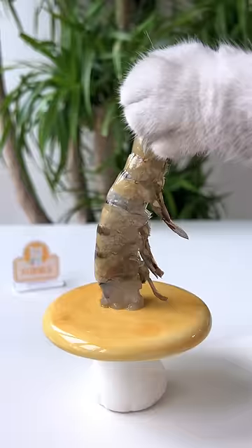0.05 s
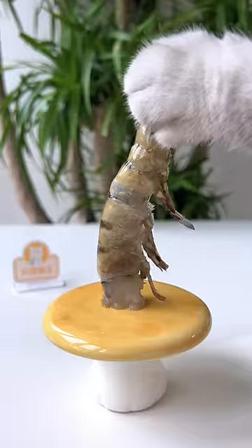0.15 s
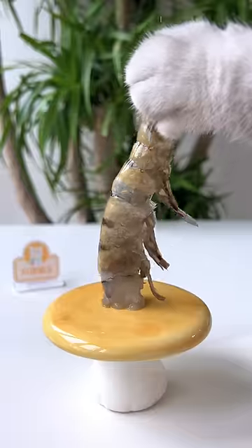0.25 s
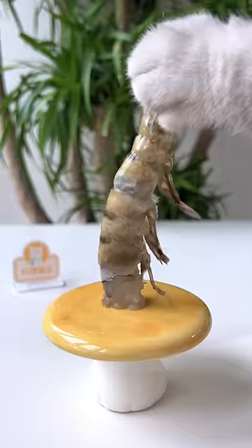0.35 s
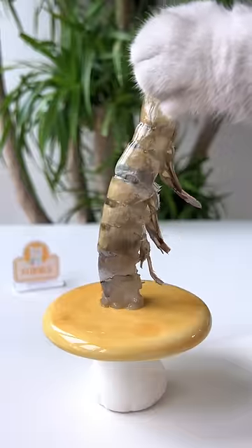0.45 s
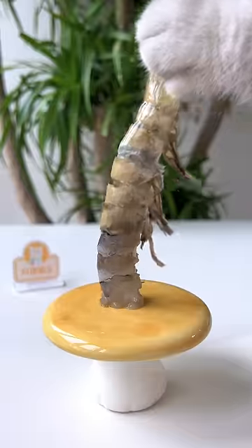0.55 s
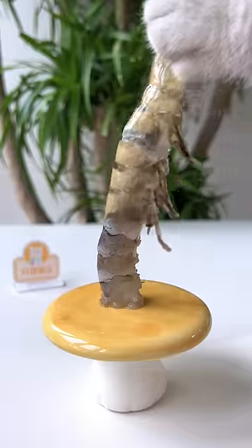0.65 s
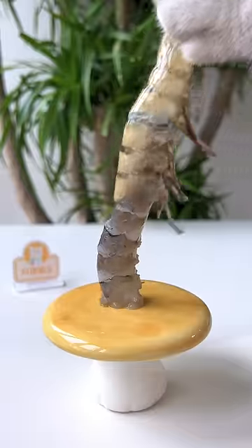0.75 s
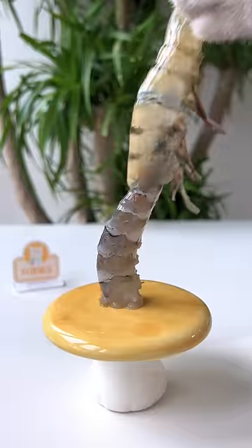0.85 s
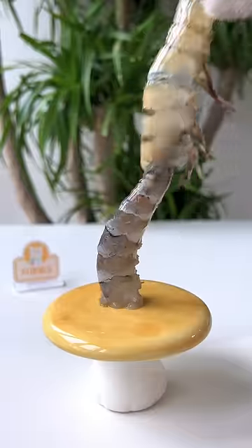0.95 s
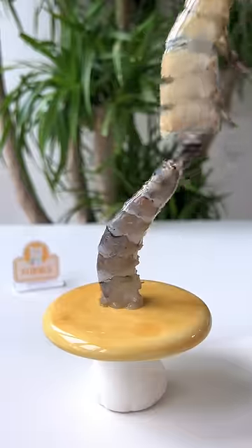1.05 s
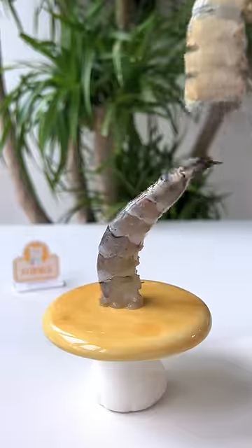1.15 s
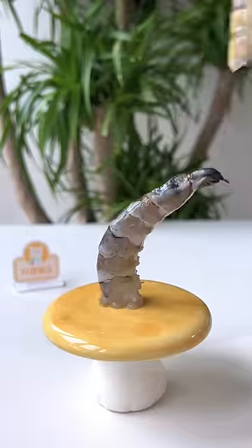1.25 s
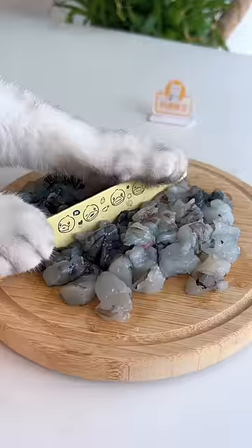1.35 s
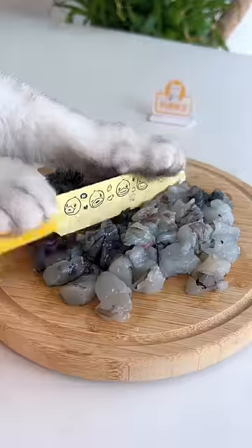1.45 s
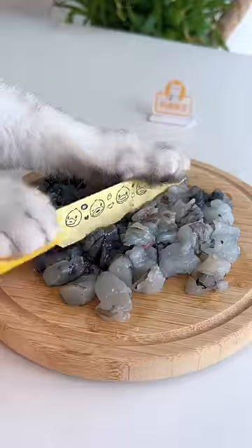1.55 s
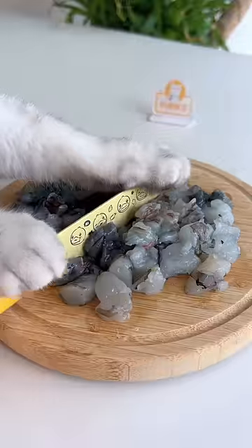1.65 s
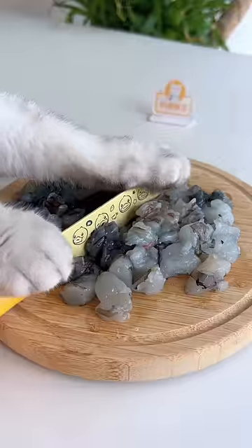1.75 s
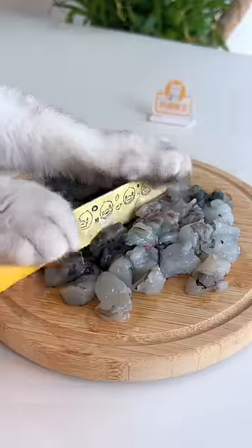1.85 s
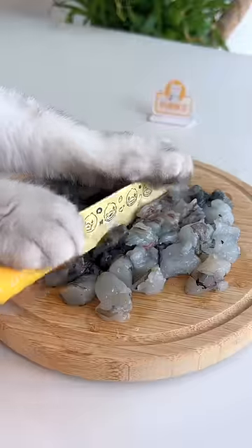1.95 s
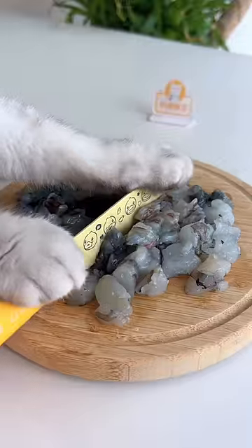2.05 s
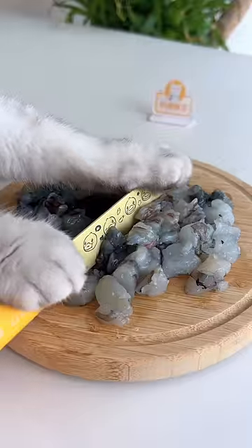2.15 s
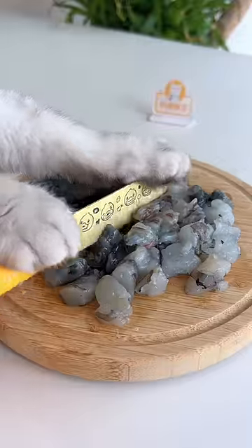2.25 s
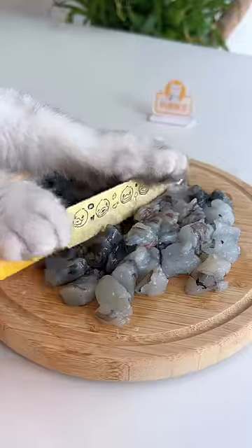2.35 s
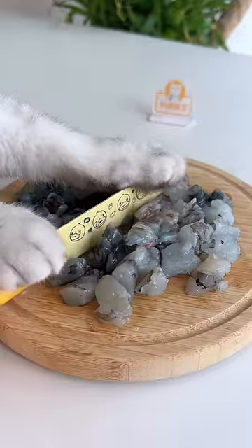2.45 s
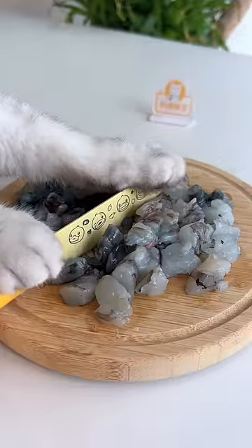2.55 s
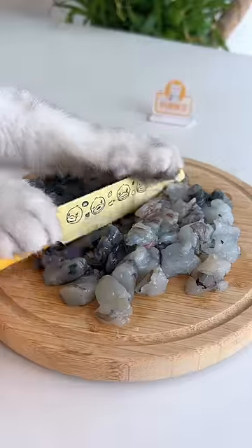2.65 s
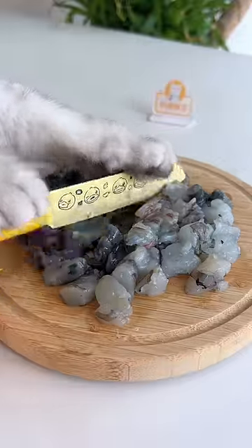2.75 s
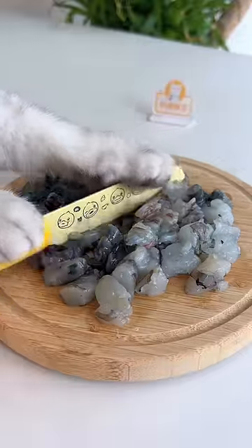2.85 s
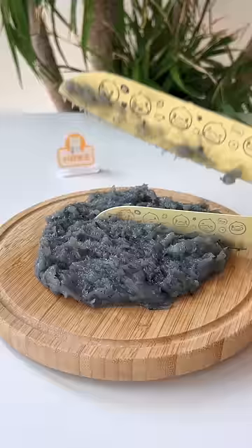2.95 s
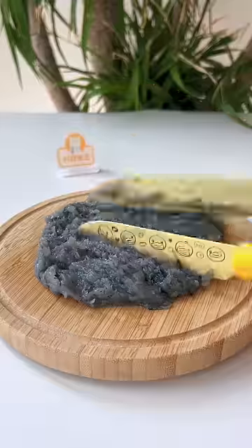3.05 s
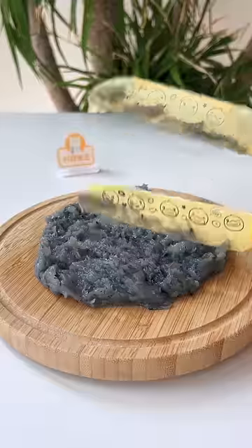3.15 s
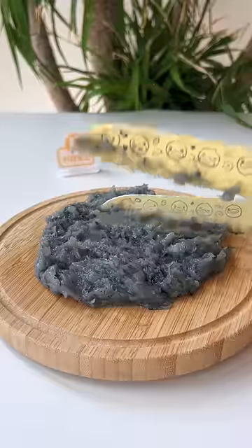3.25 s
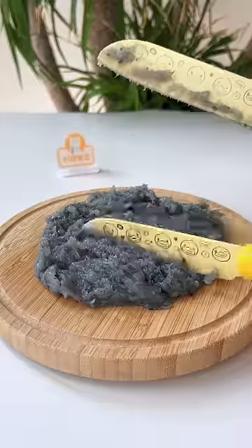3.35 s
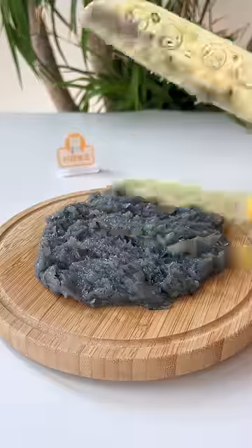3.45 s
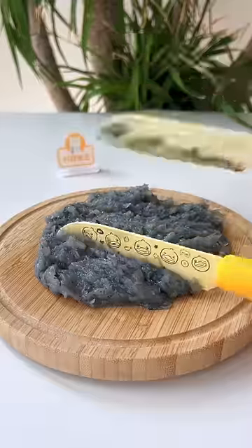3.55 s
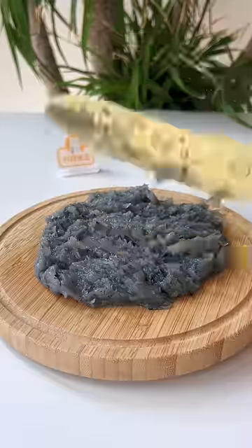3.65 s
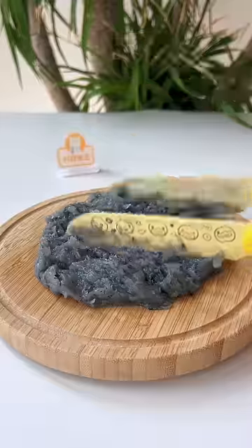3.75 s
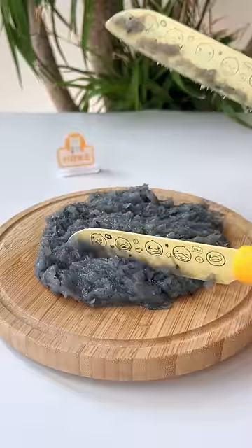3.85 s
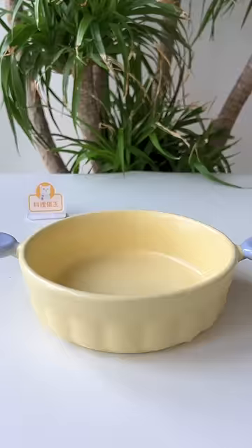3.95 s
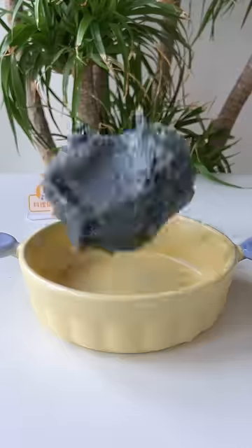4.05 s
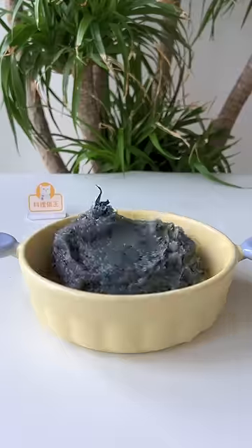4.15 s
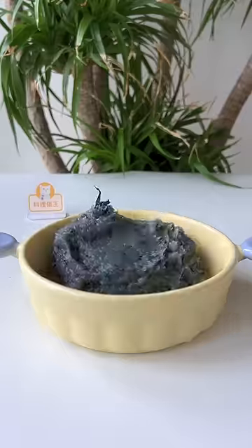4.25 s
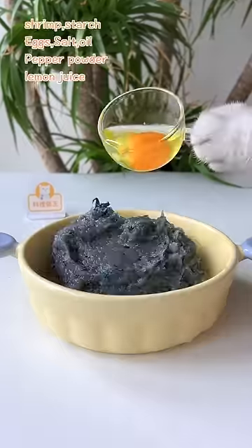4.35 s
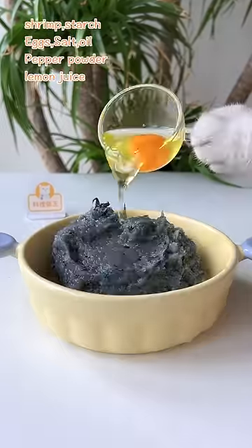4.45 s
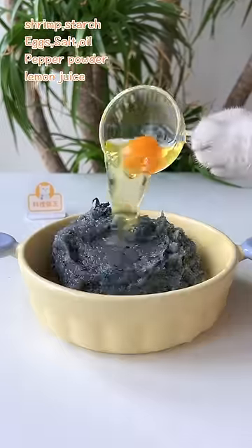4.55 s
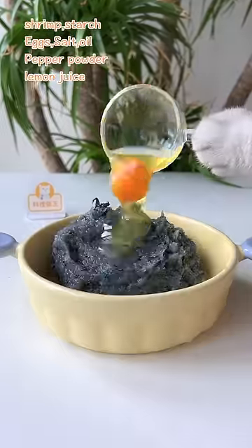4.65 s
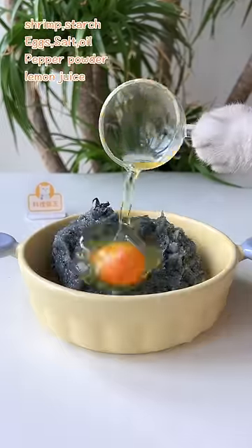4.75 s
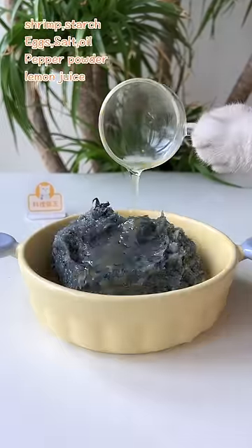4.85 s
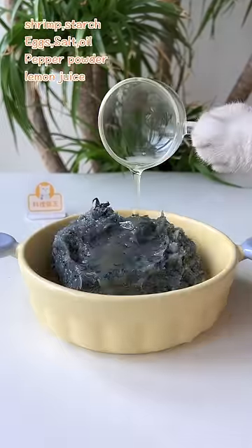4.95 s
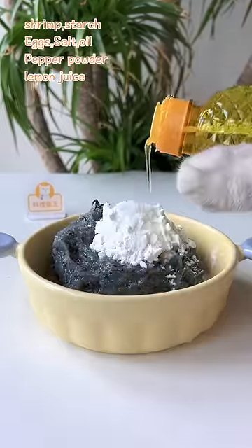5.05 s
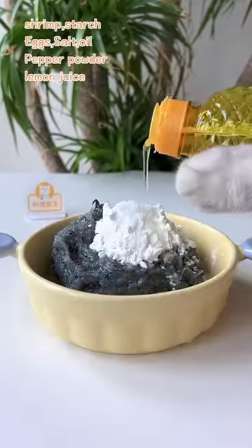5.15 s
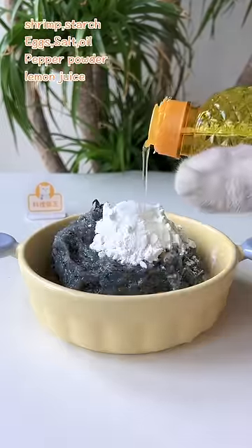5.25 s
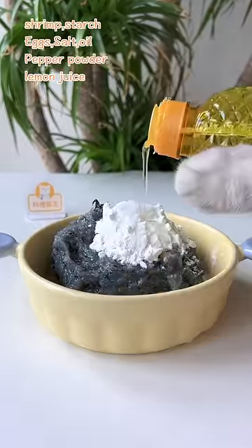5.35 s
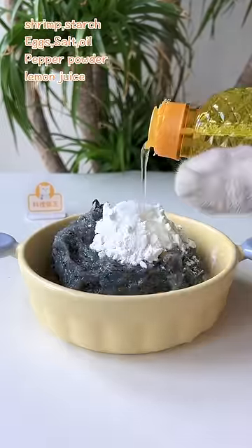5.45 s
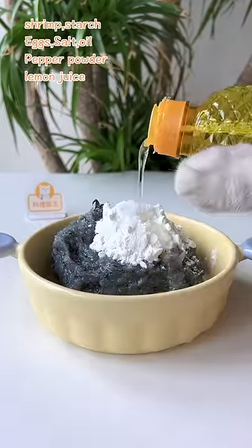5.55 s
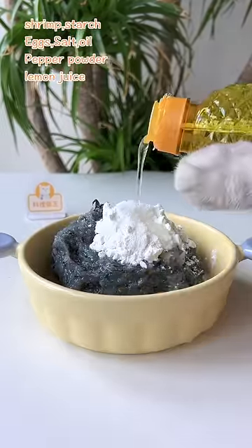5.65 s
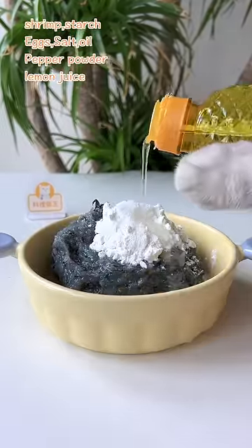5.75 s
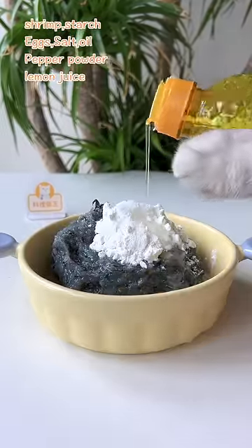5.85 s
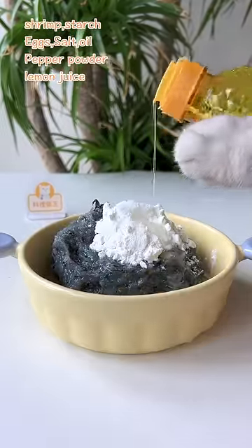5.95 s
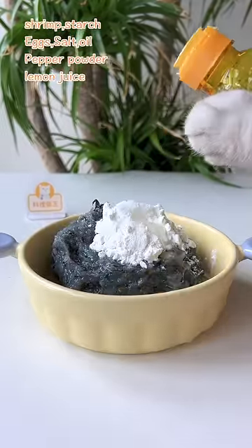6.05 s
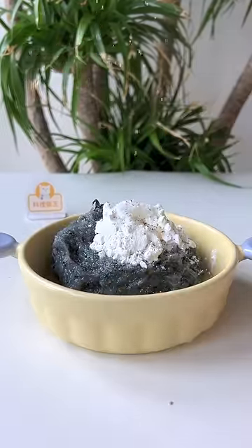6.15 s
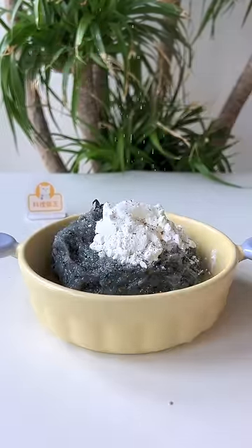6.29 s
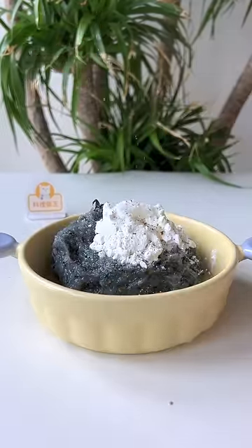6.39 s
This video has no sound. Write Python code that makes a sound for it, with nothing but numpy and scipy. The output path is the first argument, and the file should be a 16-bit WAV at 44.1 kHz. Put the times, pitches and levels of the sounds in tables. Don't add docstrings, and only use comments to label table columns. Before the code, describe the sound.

Close-up kitchen prep: brittle shell snaps, wet squashing, seven steady board chops, a sticky plop, faint egg and oil dribbles, then pattering seasoning.

```python
import sys
import numpy as np
from scipy import signal
from scipy.fft import rfft, irfft, next_fast_len
from scipy.io import wavfile
from scipy.ndimage import uniform_filter1d

SR = 44100
rng = np.random.default_rng(int(sys.argv[2]) if len(sys.argv) > 2 else 0)


def pcm_store(signal):
    levels = np.round(np.clip(np.atleast_2d(signal), -1, 1) * 32767)
    wavfile.write(sys.argv[1], SR, levels.astype(np.int16).T)


def ratio_of_db(decibels):
    return 10 ** (np.asarray(decibels, float) / 20)


N = 283122

# start t/s, end t/s, fade t/s
SHOTS = [
    (0.079, 1.137, 0.041),
    (1.563, 2.303, 0.023),
    (2.333, 3.068, 0.045),
    (3.057, 3.997, 0.049),
    (4.045, 4.239, 0.032),
    (4.433, 6.138, 0.041),
    (6.129, 6.6, 0.02),
]
# rumble level/dB, hiss over murmur level/dB, share of the stir from hands (0-1)
BEDS = [(-48, -11.5, 1), (-53.5, -10.5, 0.2), (-54, -12, 0), (-59.5, 3.5, 1), (-51.5, -4.5, .8),
        (-75.5, -1, 0), (-48, -36, .3)]
# t/s, level/dB
STIR = [(.12, -53.5), (.58, -62.5), (.7, -52.5), (1.1, -55), (1.62, -64), (2.2, -60.5), (2.69, -61),
        (2.83, -68.5), (3.09, -76), (3.2, -93), (3.88, -80.5), (3.96, -72), (4.1, -71.5), (4.76, -70),
        (4.93, -65.5), (5.65, -62.5), (6.1, -66.5), (6.2, -61.5)]

# t/s, body peak level/dB, f/Hz, bright edge peak level/dB
SHELL_SNAPS = [(.1263, -33, 3160, -38), (.2096, -18, 3850, -16), (.2143, -20.5, 3300, -47.5),
               (.2744, -14, 5000, -9), (.3158, -9, 4700, -11), (.332, -17.5, 4500, -33),
               (.4261, -38, 4270, -41.5), (.4871, -10, 2800, -6.5), (.5232, -18.5, 2200, -26.5),
               (.5513, -20.5, 3600, -32.5), (.591, -26.5, 3650, -29), (.683, -21.5, 5600, -28),
               (.735, -22, 4780, -17), (.739, -9.5, 3900, -8), (.7631, -24, 4200, -27),
               (.8515, -38.5, 1470, -23), (.922, -37.5, 3340, -23.5), (.988, -25.5, 2440, -47)]
# t/s, body peak level/dB, f/Hz, bright edge peak level/dB
KNIFE_SNAPS = [(1.6914, -24.5, 2720, -26), (1.7275, -23, 3870, -17), (1.8186, -28.5, 7600, -18.5),
               (2.0479, -33, 5600, -52), (2.1822, -27, 3660, -55), (2.4207, -65, 1790, -37),
               (2.7395, -33, 700, -19.5), (3.1082, -37, 1014, -38), (3.3819, -49, 2190, -26),
               (3.3871, -37.5, 7300, -22.5), (3.5159, -48, 1026, -28), (3.6547, -37.5, 6670, -23),
               (3.7164, -30, 7060, -15.5), (3.7801, -22, 7700, -8), (3.9248, -34, 1092, -21)]
# t/s, body peak level/dB, f/Hz, bright edge peak level/dB
GRAIN_SNAPS = [(6.2392, -26, 4780, -23), (6.2976, -19.5, 7800, -31), (6.303, -17.5, 3900, -35),
               (6.3358, -17, 6000, -10)]
# t/s, body peak level/dB, f/Hz, edge peak level/dB
SHELL_TICKS = [(0.1298, -46.0, 1120.0, -52.0), (0.1572, -44.0, 1250.0, -53.0),
               (0.168, -34.0, 2970.0, -56.0), (0.2575, -41.0, 4130.0, -52.0),
               (0.2778, -41.0, 4820.0, -47.0), (0.2988, -39.0, 5470.0, -41.0),
               (0.3066, -35.0, 4780.0, -36.0), (0.3195, -25.0, 4440.0, -16.0),
               (0.3269, -24.0, 4260.0, -29.0), (0.4904, -35.0, 3400.0, -40.0),
               (0.5405, -31.0, 3570.0, -50.0), (0.6754, -33.0, 3920.0, -48.0),
               (0.6858, -48.0, 2540.0, -45.0), (0.699, -47.0, 3270.0, -47.0),
               (0.8514, -42.0, 1590.0, -29.0), (0.9125, -41.0, 1210.0, -34.0),
               (0.9219, -43.0, 6200.0, -27.0), (1.0274, -50.0, 2450.0, -52.0),
               (1.0592, -48.0, 2200.0, -50.0), (1.0805, -53.0, 1850.0, -42.0)]
BOARD_TICKS = [(1.8747, -51, 4500, -49), (1.847, -52, 6800, -48), (2.0571, -48, 2070, -35),
               (2.2741, -51, 5500, -51), (2.6135, -41, 5000, -45), (2.9964, -50, 1890, -48),
               (3.2469, -44, 2020, -38), (3.2852, -66, 3230, -53), (3.3956, -51, 7110, -32),
               (3.5701, -65, 5040, -49), (4.1104, -40, 6000, -42), (4.1366, -36, 5000, -40),
               (4.1475, -14, 4600, -28), (4.1983, -34, 5400, -45), (6.2585, -36, 3500, -36)]
BOWL_TICKS = [(4.5018, -51.0, 2020.0, -73.0), (4.5105, -45.0, 3880.0, -51.0), (4.548, -46.0, 2200.0, -72.0),
              (4.5569, -50.0, 7320.0, -42.0), (4.6497, -57.0, 3490.0, -53.0),
              (4.6539, -47.0, 5680.0, -63.0), (4.6859, -39.0, 3190.0, -60.0), (4.698, -37.0, 4090.0, -58.0),
              (4.7518, -44.0, 2930.0, -61.0), (4.7653, -58.0, 3880.0, -50.0),
              (4.7797, -52.0, 2800.0, -38.0), (4.7987, -56.0, 1720.0, -52.0),
              (4.9414, -47.0, 4260.0, -42.0), (4.9611, -50.0, 2970.0, -46.0),
              (5.0108, -48.0, 5430.0, -46.0), (5.0333, -41.0, 4870.0, -57.0),
              (5.1061, -46.0, 2150.0, -42.0), (5.1312, -45.0, 1120.0, -64.0),
              (5.2548, -40.0, 4310.0, -43.0), (5.3301, -43.0, 1160.0, -41.0), (5.339, -56.0, 7240.0, -42.0),
              (5.3734, -38.0, 2710.0, -51.0), (5.382, -47.0, 4870.0, -46.0), (5.461, -48.0, 2580.0, -50.0),
              (5.4644, -53.0, 7490.0, -45.0), (5.5846, -48.0, 6290.0, -46.0),
              (5.6195, -44.0, 1940.0, -38.0), (5.6561, -33.0, 5210.0, -57.0),
              (5.7048, -45.0, 3700.0, -52.0), (5.7218, -28.0, 3400.0, -49.0),
              (5.7261, -32.0, 4130.0, -40.0), (5.7468, -42.0, 2670.0, -46.0),
              (5.8562, -46.0, 4780.0, -47.0), (5.9209, -33.0, 5000.0, -53.0), (5.963, -54.0, 3400.0, -46.0),
              (6.0026, -36.0, 3010.0, -52.0), (6.0141, -27.0, 4440.0, -42.0),
              (6.0486, -42.0, 5470.0, -52.0)]
TICK_DB, TICK_EDGE_DB = 2.5, 4

# t/s, peak level/dB, f/Hz
LUMP_FILMS = [(4.1066, -28, 1200), (4.1289, -35, 1214), (4.1488, -14, 2300), (4.1533, -19.5, 3700),
              (4.191, -24, 2040), (4.198, -26, 1010), (4.2152, -32, 5150)]
EGG_FILMS = [(4.5176, -33.5, 1870), (4.6326, -31.5, 3280), (4.691, -34.5, 3120), (4.8294, -32, 2580),
             (4.8508, -27, 2090), (4.9187, -38, 2890), (4.9273, -35.5, 7550)]
OIL_FILMS = [(5.0577, -34, 2150), (5.1633, -28, 2460), (5.163, -33.5, 7550), (5.186, -27, 6800),
             (5.2198, -34, 7500), (5.2277, -29, 2600), (5.2853, -34, 4400), (5.331, -34.5, 900),
             (5.356, -39, 800), (5.3898, -29, 2040), (5.4708, -28, 3290), (5.5372, -31.5, 6970),
             (5.5666, -30, 6830), (5.614, -27, 4800), (5.6595, -24, 3720), (5.717, -16.5, 3880),
             (5.7543, -30, 3660), (5.8589, -33.5, 2640), (5.8656, -30, 3800), (5.9436, -32.5, 1970)]
THIN_HZ = 6200
THICK_EDGE_DB, THIN_EDGE_DB = -27.5, 7
GLUG_MS, GLUG_HZ, GLUG_DB = 11, 761, -30.5

# t/s, level/dB, contact t/ms
FLESH_CHOPS = [(1.714, -29, 3), (1.725, -27, 3.06), (1.737, -29, 3), (2.476, -42, 4), (2.913, -25, 5),
               (3.401, -30, 4.5), (2.742, -33.5, 1.72)]
# t/s, level/dB, contact t/ms, suck level/dB, brightness (0-1)
PASTE_CHOPS = [(3.1139, -19.5, 1.13, -53.5, 0.042), (3.256, -20, 1.94, -58, 0.54),
               (3.385, -20.5, 4, -65, 1), (3.52, -16.5, 1.76, -66, 0.73), (3.653, -23.5, 4.4, -64, 0.46),
               (3.7905, -19, 1.05, -59, 0.69), (3.932, -17.5, 2.66, -61, 0.67)]
# f/Hz, width f/Hz, level/dB
BOARD_MODES = [(80, 37, 0), (136.6, 45, 7.5), (180, 24, 5.5), (268, 57, 7.5), (474, 85, -2),
               (1080, 190, -7), (2000, 86, -4.5)]
# f/Hz, width f/Hz, level/dB
BLADE = (2040, 45, 13)
RING_DB, RING_T60_S = -39, .075
SUCK_MS, SUCK_LEAD_S = 29, 0.0037

# centre t/s, length t/ms, level/dB, brightness (0-1)
PEEL = [(.158, 40, -52, 0), (.3178, 6, -20.5, .72), (.675, 12, -48, 0), (.873, 14, -52, .5),
        (.208, 24, -48, .3), (.304, 39, -47.5, 0.6), (.323, 9.1, -32, 0.69), (.33, 20, -35.5, 0.24),
        (.502, 34, -42, 0.2), (.541, 31, -42.5, 0.2), (.636, 37, -45, 0), (.732, 20, -43, 0),
        (.776, 71, -41, 0.47), (.85, 15, -50, 0.9), (.92, 34, -48, 0.86), (1.1, 51, -57, 1)]
SQUASH = [(1.598, 49, -61, 0), (1.705, 36, -39, 0.31), (1.731, 36.2, -34, 0.57), (1.768, 39.6, -37.5, 0.62),
          (1.943, 54.5, -49, 0.3), (2.082, 52.4, -41, 0.82), (2.118, 29.8, -34, 1), (2.184, 30, -55, 0.6),
          (2.518, 47.5, -42.5, 0.78), (2.556, 35, -33, 0.85), (2.637, 57, -51, 1), (2.743, 40.5, -49.5, .2),
          (2.917, 49.4, -37, 0.75), (2.943, 38.7, -37.5, 1), (3.014, 34.5, -52.5, 1), (3.68, 45, -57, .1)]
PLOP = [(4.114, 20, -47.5, 0.45), (4.136, 15.2, -41, 0.13), (4.153, 16.8, -31, 0.99), (4.17, 31, -49, 0.92),
        (4.201, 17.4, -37, 0)]
DRIBBLE = [(4.59, 48, -51, 0.49), (4.692, 25, -53, 0.55), (4.722, 22, -52.5, .3), (4.86, 39.2, -38, 0.3),
           (4.968, 70, -54, 0.52), (5.078, 57, -62, 0), (5.172, 31, -51, 0.4), (5.234, 54, -48, 0.66),
           (5.399, 35, -49.5, 0.47), (5.558, 39, -53, 0.8), (5.607, 31, -50, 0), (5.72, 30, -48, 0.8),
           (5.801, 30, -53.5, 1), (5.93, 41, -50, 0.059), (5.906, 14, -50, .8), (5.995, 40, -54, .6),
           (5.83, 30, -55, .4), (5.43, 30, -56, .6), (6.068, 58, -61.5, 0.17)]
SPRINKLE = [(6.251, 42, -49, 0.86), (6.306, 22, -41, 0.1), (6.35, 36.7, -45, .3), (6.39, 71.5, -50, 0.33),
            (6.285, 30, -52, .5), (6.325, 25, -48, .5), (6.2395, 5, -43, .8), (6.338, 6, -34, .8)]
# hollow, smack and fizz level/dB
SHELL_WET, FLESH_WET = [(-29.5, 1, -13), (-14.5, -12.5, 2)], [(0, -20.5, -5.5), (0, 0.5, -5)]
PASTE_WET, LUMP_WET = [(0, -36, -8.5), (0, 4, 17.5)], [(0, -22, -21), (0, 2.5, -17)]
DRIP_WET, GRAIN_WET = [(2, -13.5, -17.5), (-14, 0, -4.5)], [(-2.5, 0, -5.5), (-11, 0, 5.5)]
SEEP_S, SEEP_DB, SEEP_FIZZ_DB = 0.05, -26, -19

# centre t/s, length t/ms, f/Hz, level/dB
POCKETS = [(1.77, 37.5, 1895, -35.5), (1.768, 34, 3910, -38.5), (1.768, 24, 4590, -41),
           (1.947, 75, 2150, -51.5), (2.118, 24, 1700, -32), (3.675, 50, 2030, -64),
           (5.084, 35, 2300, -53.5), (5.171, 24, 1596, -56), (2.546, 9, 1000, -30), (2.557, 22, 1900, -31),
           (2.556, 18, 1100, -34), (2.558, 12, 3750, -35), (2.915, 14, 3400, -37), (2.944, 22, 3700, -36),
           (2.937, 20, 950, -38), (3.015, 25, 3800, -54), (2.075, 30, 950, -45), (2.082, 25, 2500, -43),
           (4.587, 22, 2900, -53), (4.857, 24, 2500, -41), (4.862, 20, 1800, -45), (5.276, 22, 2380, -54),
           (5.42, 30, 6800, -56), (5.595, 20, 1550, -52), (5.603, 14, 2030, -43), (5.41, 25, 2030, -56),
           (5.622, 14, 2020, -45), (5.838, 20, 2800, -54), (5.58, 20, 2030, -54), (6.07, 18, 1020, -57),
           (6.092, 40, 1306, -61.5), (0.64, 77, 1294, -55.5)]
# t/s, t60 t/ms, f/Hz, level/dB
BUBBLES = [(4.868, 160, 230, -50), (2.74, 30, 520, -36), (4.198, 45, 330, -33), (4.1288, 14, 1200, -30),
           (4.1525, 16, 1700, -22), (4.157, 16, 4000, -21), (5.058, 22, 2150, -38), (5.163, 25, 2500, -38),
           (5.214, 15, 4050, -36), (5.39, 34, 2040, -30), (5.538, 18, 2800, -43), (5.608, 14, 3000, -42),
           (5.858, 25, 1430, -41), (5.9035, 22, 3300, -38), (5.9697, 22, 3420, -29), (6.074, 12, 3480, -46),
           (6.3005, 20, 2900, -26)]
BUBBLE_RISE = 3

# f/Hz, density level/dB
FLESH = [(260, -34), (450, -9.5), (1000, -5.5), (1500, -10.5), (1940, -5), (2220, -8.5), (3770, -5.5),
         (5660, -9.5), (9590, -8), (11500, -14.5), (14000, -2), (15800, -11), (16500, -34.5)]
RUMBLE = [(15, -36), (25, -1.5), (70, 1.5), (162, -1), (313, -9.5), (470, -23), (680, -57), (1140, -120)]
AIR = [(320, -47), (550, -11), (742, -4.5), (1580, -1), (4780, -17.5), (8950, -23.5), (11700, -21),
       (14100, -19), (15800, -26.5), (16500, -47)]
TRICKLE = (4.45, 6.11)
# f/Hz, level/dB
BOWL_TONE = [(450, -11), (620, -7), (950, -3), (9000, 3.5), (15000, -9.5)]
WIDE_FROM = 6.14
# f/Hz, level/dB
WIDTH = [(40, -8), (300, -20), (650, 8.5), (2000, 0), (10000, 1), (15000, -5.5)]


def unit(x):
    return x / np.sqrt(np.mean(x ** 2) + 1e-20)


def along(points, hz):
    f, v = np.transpose(points)
    return np.interp(np.log(hz + 1), np.log(f + 1), v)


def filtered(x, response):
    m = next_fast_len(N + SR // 4, True)
    return irfft(rfft(x, m) * response(np.fft.rfftfreq(m, 1 / SR)), m)[..., :N]


def band(x, spectrum, lo_hz, hi_hz):
    def response(f):
        edges = 1 / np.sqrt((1 + (lo_hz / (f + 1)) ** 8) * (1 + (f / hi_hz) ** 8))
        return ratio_of_db(along(spectrum, f)) * edges
    return unit(filtered(x, response))


def resonance(f, hz, width, db):
    return ratio_of_db(db) * 1j * f * width / (hz * hz - f * f + 1j * f * width)


def wander(length):
    return unit(uniform_filter1d(rng.standard_normal(N), size=length))


def snaps(table):
    out, t = np.zeros((2, N + 900)), np.arange(800) / SR
    jf = 1j * np.fft.rfftfreq(2 * len(t), 1 / SR)
    burst = ratio_of_db(-60 * t / 0.002) + 0.048 * ratio_of_db(-60 * t / 0.025)
    flick = ratio_of_db(-60 * t / 0.003) + .06 * ratio_of_db(-60 * t / 0.032)
    steep = lambda x: 1 / ((1 + x) * (1 + x + x * x))
    for s, db, hz, edge_db in table:
        hiss = rng.standard_normal((2, len(t)))
        cycles = 10 * ratio_of_db(rng.normal(0, 2.5))
        pocket = np.sin(2 * np.pi * hz * t) * ratio_of_db(-60 * t * max(hz, 2900) / cycles)
        crack = 0.61 * max(3000 / hz, 1) * hiss[0] * burst
        size = steep(0.53 * hz / (jf + 1)) * steep(jf / np.clip(2.0 * hz, 6000, 9500))
        body = irfft(size * rfft(pocket + crack, 2 * len(t)))[:len(t)]
        edge = np.diff(hiss[1], prepend=0) * flick
        first = round(s * SR)
        out[0, first:][:len(t)] += ratio_of_db(db) * body / abs(body).max()
        out[1, first:][:len(t)] += ratio_of_db(edge_db) * edge / abs(edge).max()
    return out[0, :N] + filtered(out[1, :N], lambda f: f ** 4 / (f ** 4 + 8000 ** 4))


def faint_ticks(start, end, top_db, low_hz, count):
    u = rng.random((count, 4))
    when = start + (end - start) * u[:, 0]
    edge_db = top_db - 4 - 22 * u[:, 3]
    return np.c_[when, top_db - 16 * u[:, 1], low_hz * 5 ** u[:, 2], edge_db]


def films():
    return [(s, db, hz, db + (THIN_EDGE_DB if hz > THIN_HZ else THICK_EDGE_DB))
            for s, db, hz in LUMP_FILMS + EGG_FILMS + OIL_FILMS]


def chops():
    push, shudder = np.zeros(N), np.zeros(N)
    t, after = np.arange(-300, 300) / SR, np.arange(SR // 6) / SR
    for s, db, ms, *_ in FLESH_CHOPS + PASTE_CHOPS:
        hit = round(s * SR)
        push[hit - 300:][:len(t)] += ratio_of_db(db + 6.5) / ms * np.exp(-(t / ms * 1500) ** 2)
        push[hit] += ratio_of_db(db + 8.5)
        decay = ratio_of_db(db - 23.5 - 60 * after / 0.28)
        shudder[hit:][:len(after)] += decay * (1 - np.exp(-after / .008))
    wood = lambda f: sum(resonance(f, *mode) for mode in BOARD_MODES)
    spread = lambda f: np.exp(2j * np.pi * (f * .0073 - 0.0081 * 310 * np.arctan(f / 310)))
    lumps = ratio_of_db(3.4 * wander(700))
    table_tone = [(80, 6.5), (200, 2), (400, -11.5), (900, -23.0), (2500, -48.0)]  # f/Hz, level/dB
    tail = shudder * lumps * band(rng.standard_normal(N), table_tone, 60, 3000)
    return filtered(push, lambda f: wood(f) * spread(f)) + tail


def wet(grain_db, patchy_db, frames):
    uneven = unit(uniform_filter1d(rng.exponential(size=N) ** 2 - 2, size=24))
    sizes = ratio_of_db(grain_db * uneven.clip(-2, 4))
    z = signal.stft(sizes * rng.standard_normal(N), nperseg=256)[2]
    field = uniform_filter1d(rng.standard_normal(z.shape), size=3, axis=0)
    field = uniform_filter1d(field, size=frames, axis=1)
    return signal.istft(z * ratio_of_db(patchy_db * unit(field)), nperseg=256)[1][:N]


def squeezes():
    sucks = [(s - SUCK_LEAD_S, SUCK_MS, db, bright) for s, _, _, db, bright in PASTE_CHOPS]
    foods = [(PEEL, SHELL_WET), (SQUASH, FLESH_WET), (sucks, PASTE_WET),
             (PLOP, LUMP_WET), (DRIBBLE, DRIP_WET), (SPRINKLE, GRAIN_WET)]
    return [(s, ms, *(db + (1 - b) * np.array(dull) + b * np.array(bright)))
            for rows, (dull, bright) in foods for s, ms, db, b in rows]


def squelch():
    power = np.zeros((3, N))
    for s, ms, *db in squeezes():
        k = np.arange(int((s - ms / 800) * SR), min(int((s + ms / 600) * SR), N))
        skew = np.clip(.9 - ms / 45, 0, .7)
        lag = (k / SR - s) / (ms / 2200) + skew
        swell = np.exp(-abs(lag / np.where(lag < 0, 1 - skew, 1 + skew)) ** 2.25)
        power[:, k] += np.outer(ratio_of_db(db) ** 2, swell ** 2)
    grains = wet(grain_db=2.5, patchy_db=3.5, frames=7)
    parts = [band(grains, FLESH, lo, hi) for lo, hi in [(650, 2480), (2600, 6280), (7500, 15600)]]
    low = band(rng.standard_normal(N), [(60, -1), (180, -3.5), (600, -4.5)], 50, 530)
    load = ratio_of_db(-7.5) * np.sqrt(power[0]) * low
    return load, np.sum(np.sqrt(power) * parts, axis=0), power


def glugs():
    return [(s + 0.00298, GLUG_MS, GLUG_HZ * ratio_of_db(rng.normal()), GLUG_DB + db)
            for s, db, hz in OIL_FILMS if hz < THIN_HZ]


def pockets():
    out = np.zeros(N)
    for s, ms, hz, db in POCKETS + glugs():
        t = np.arange(int(ms / 650 * SR)) / SR
        flutter = uniform_filter1d(rng.standard_normal((2, len(t))), size=110, axis=1)
        tone = (unit(flutter[0]) + 1.07) * np.cos(2 * np.pi * hz * t)
        tone = tone + unit(flutter[1]) * np.sin(2 * np.pi * hz * t)
        out[round(s * SR) - len(t) // 2:][:len(t)] += ratio_of_db(db) * np.hanning(len(t)) ** 0.91 * tone
    return out


def bubbles():
    out, t = np.zeros(N + SR // 8), np.arange(SR // 8) / SR
    rising = [(*row, BUBBLE_RISE) for row in BUBBLES]
    rings = [(s - .006, 1000 * RING_T60_S, BLADE[0], db + RING_DB, 0) for s, db, *_ in PASTE_CHOPS]
    for s, ms, hz, db, rise in rising + rings:
        tone = np.sin(2 * np.pi * hz * (t + rise * t * t / 2))
        out[round(s * SR):][:len(t)] += ratio_of_db(db - 60000 * t / ms) * (1 - np.exp(-t / .0005)) * tone
    return out[:N]


def background(squeezed):
    rows, t, level = np.array(STIR), np.arange(N) / SR, np.zeros((3, N))
    for (start, end, _), (rumble_db, hiss_db, hands) in zip(SHOTS, BEDS):
        s, db = rows[(rows[:, 0] > start) & (rows[:, 0] < end)].T
        now = (t >= start) & (t < end)
        stir = np.interp(t[now], s, db)
        shake = hands * (stir - stir.mean())
        level[:, now] = ratio_of_db([rumble_db + shake, stir, stir + hiss_db - .5 * shake])
    keep = np.exp(-1 / (SEEP_S * SR))
    seep = signal.lfilter([1 - keep], [1, -keep], squeezed)
    level[1] = np.sqrt(level[1] ** 2 + ratio_of_db(SEEP_DB) ** 2 * (seep[0] + seep[1]))
    level[2] = np.sqrt(level[2] ** 2 + ratio_of_db(SEEP_FIZZ_DB) ** 2 * seep[2])
    rumble = level[0] * band(rng.standard_normal(N), RUMBLE, 15, 600)
    board = (t > 1.5) & (t < 3.06)
    rumble = rumble + ratio_of_db(-5) * board * level[1] * band(rng.standard_normal(N), FLESH, 400, 690)
    damp = wet(grain_db=1.0, patchy_db=3.5, frames=6)
    murmur = level[1] * band(damp, AIR, 480, 4500)
    hiss = level[2] * band(damp, AIR, 4000, 17000)
    return rumble, murmur + hiss


def scene():
    t = np.arange(N) / SR
    cuts = sum(np.clip((t - a) / fade, 0, 1) ** 2 * np.clip((b - t) / fade, 0, 1) ** 2
               for a, b, fade in SHOTS)
    trickling = (t > TRICKLE[0]) & (t < TRICKLE[1])
    load, smack, squeezed = squelch()
    rumble, murmur = background(squeezed)

    knife = (t > 3.06) & (t < 4)
    blade = filtered(smack * knife, lambda f: resonance(f, *BLADE))
    shell = filtered(snaps(SHELL_SNAPS), lambda f: f ** 6 / (f ** 6 + 950 ** 6))
    faint = np.r_[faint_ticks(.1, 1.1, top_db=-45, low_hz=2200, count=24),
                  faint_ticks(*TRICKLE, top_db=-46, low_hz=1800, count=140)]
    small = np.r_[SHELL_TICKS, BOARD_TICKS, BOWL_TICKS] + [0, TICK_DB, 0, TICK_EDGE_DB]
    fits = ratio_of_db(0.93 * wander(600))
    sputter = ratio_of_db(3.5 * wander(220) * trickling)
    moist = murmur * fits * sputter + smack + pockets() + shell
    moist = moist + snaps([*faint, *KNIFE_SNAPS, *films(), *GRAIN_SNAPS])
    moist = moist + snaps(small) + bubbles()

    yolk = abs(t - 4.87) < .07
    in_bowl = trickling & ~yolk
    oil = filtered(moist, lambda f: ratio_of_db(along(BOWL_TONE, f)))
    egg = filtered(oil, lambda f: f ** 4 / (f ** 4 + 750 ** 4))
    moist = np.where(in_bowl, np.where(t < 4.82, egg, oil), moist)
    load = load * ~in_bowl * (t > 1.5) * ratio_of_db(1.7 * yolk)
    deep = filtered(rumble, lambda f: 1.8 / (1 + (f / 150) ** 2))
    rumble = np.where(t > WIDE_FROM, deep, rumble)

    mid = cuts * (rumble + load + moist + blade + chops())
    wide = mid * np.clip((t - WIDE_FROM) / .01, 0, 1)
    side = filtered(wide, lambda f: ratio_of_db(along(WIDTH, f)) * np.exp(1j * (2.2 + 2 * np.pi * f * .0002)))
    return np.array([mid + side, mid - side])


def top_cut(x):
    return signal.sosfilt(signal.butter(12, 16970, fs=SR, output="sos"), x)


def record(dry):
    roll_off = [(15700, -1.5), (16200, -27.5), (16900, -19.5), (17100, -95)]  # f/Hz, level/dB
    mix = filtered(dry, lambda f: ratio_of_db(along(roll_off, f)))
    return top_cut(mix)


dry = scene()
out = record(dry)
pcm_store(out)
```